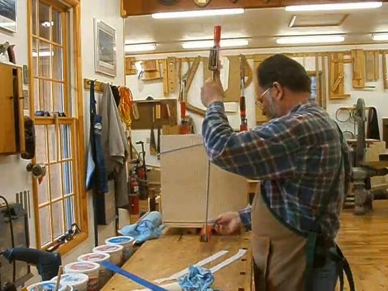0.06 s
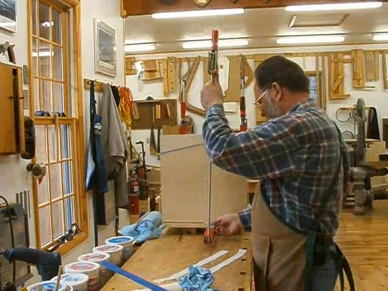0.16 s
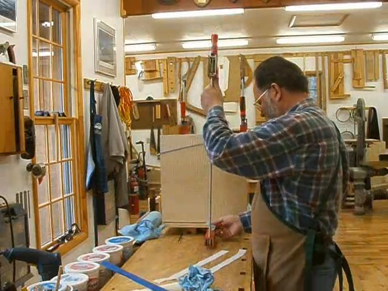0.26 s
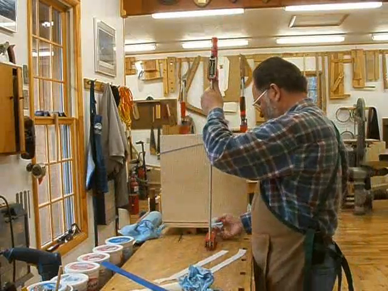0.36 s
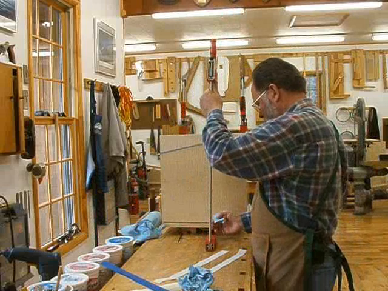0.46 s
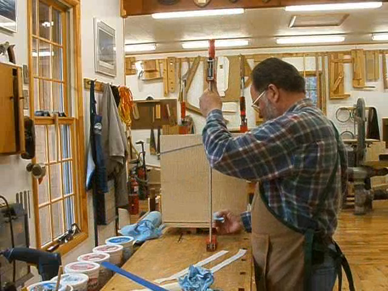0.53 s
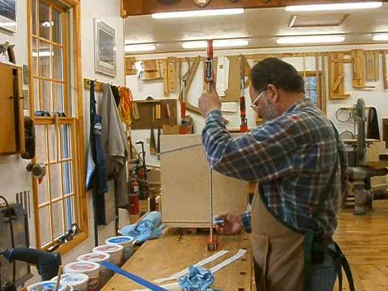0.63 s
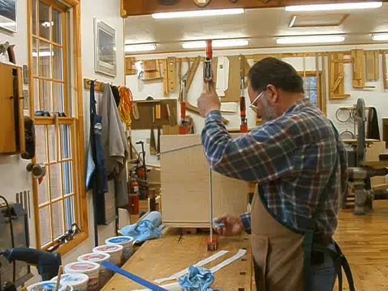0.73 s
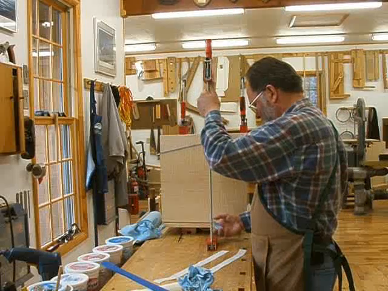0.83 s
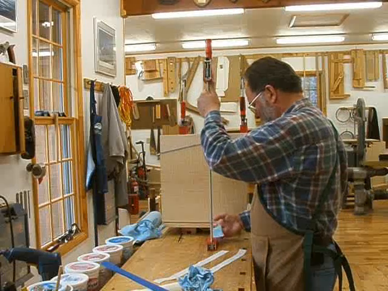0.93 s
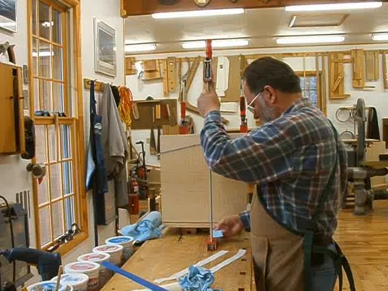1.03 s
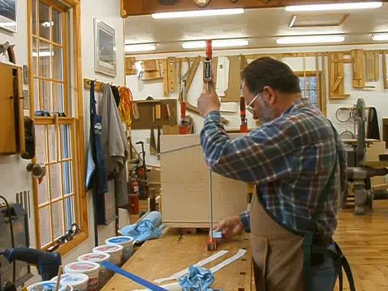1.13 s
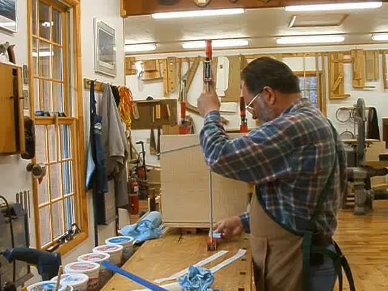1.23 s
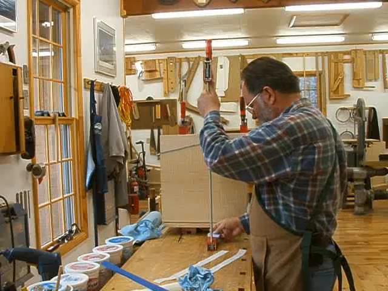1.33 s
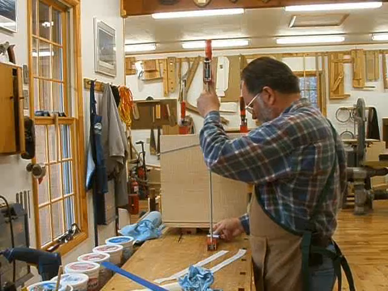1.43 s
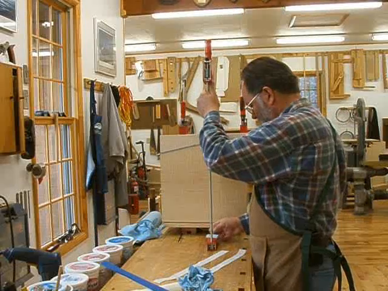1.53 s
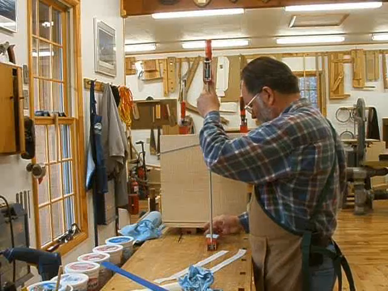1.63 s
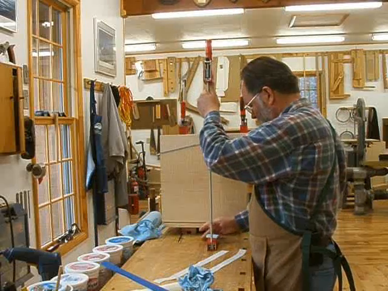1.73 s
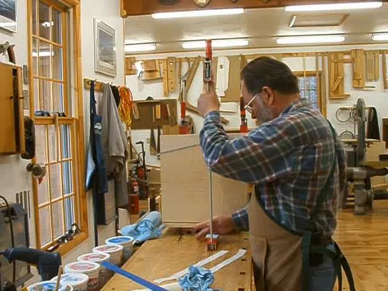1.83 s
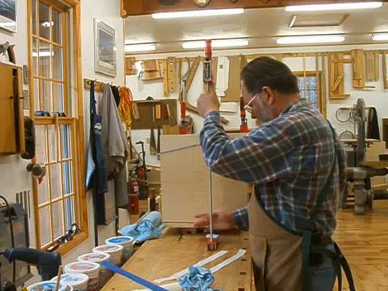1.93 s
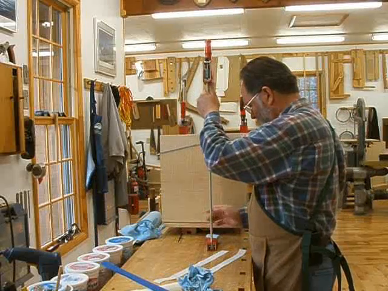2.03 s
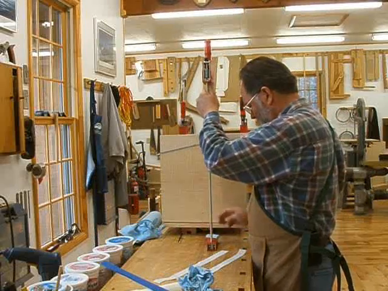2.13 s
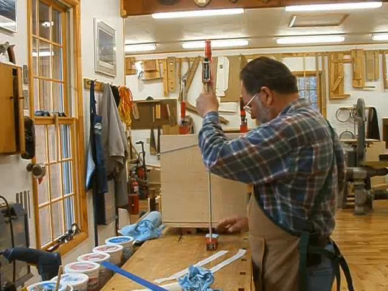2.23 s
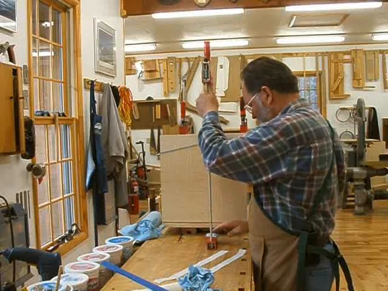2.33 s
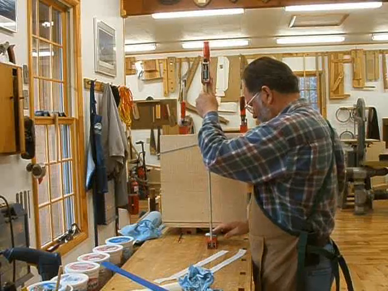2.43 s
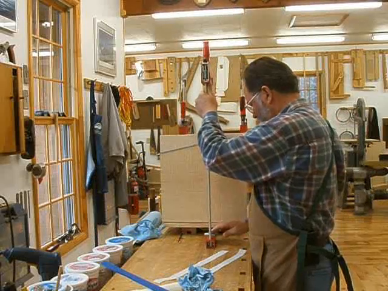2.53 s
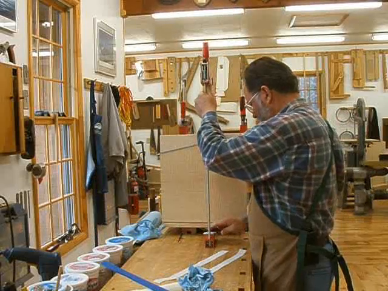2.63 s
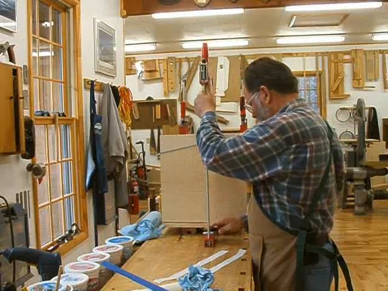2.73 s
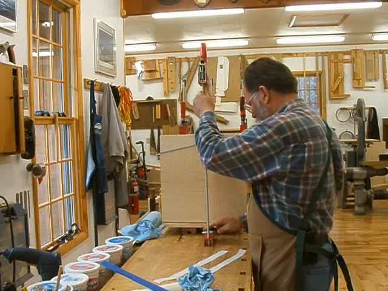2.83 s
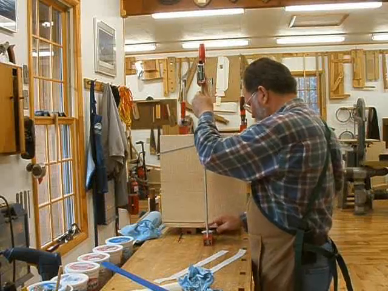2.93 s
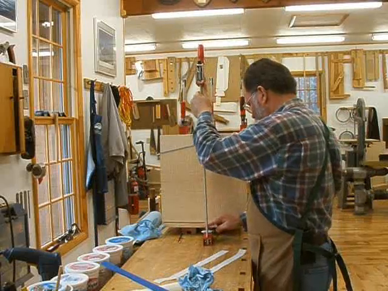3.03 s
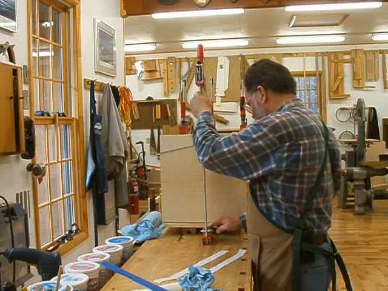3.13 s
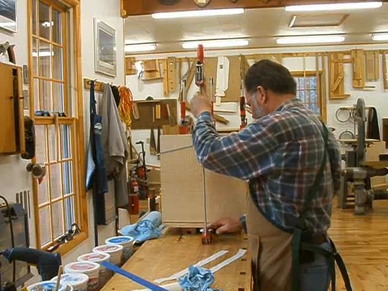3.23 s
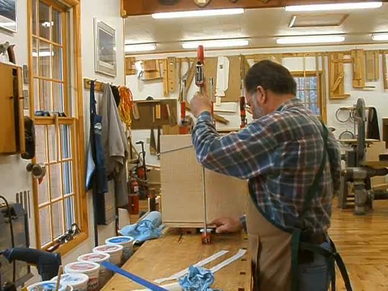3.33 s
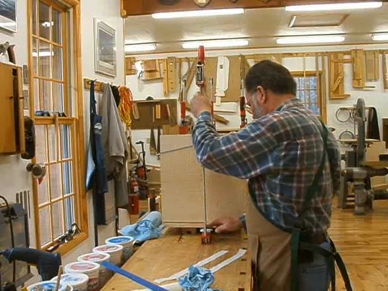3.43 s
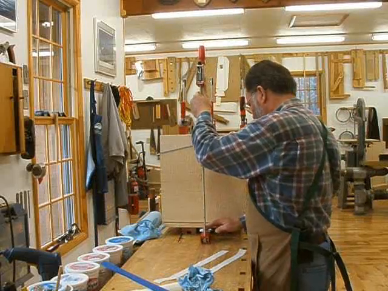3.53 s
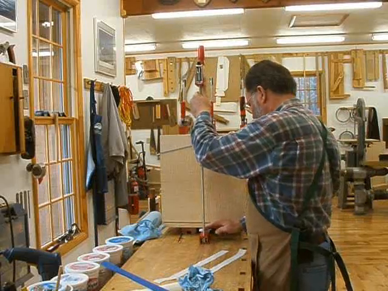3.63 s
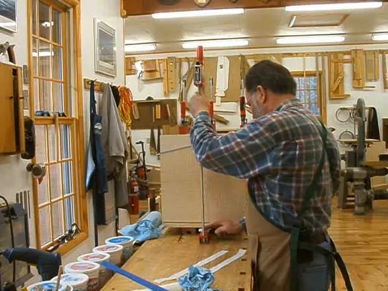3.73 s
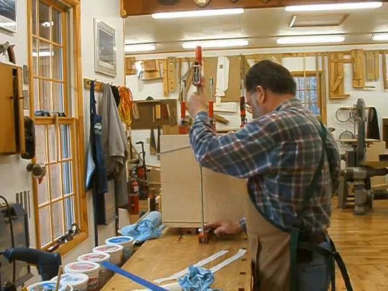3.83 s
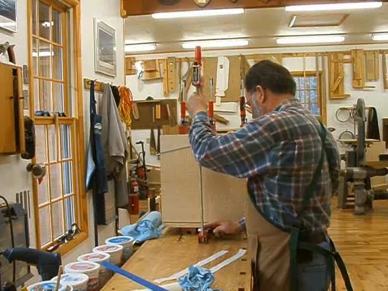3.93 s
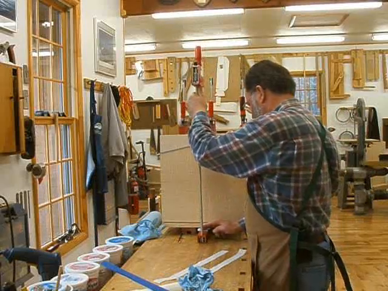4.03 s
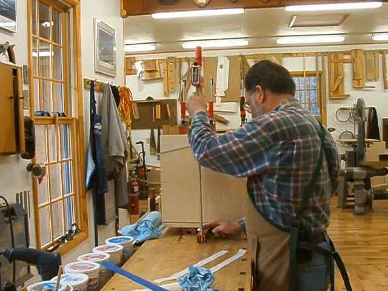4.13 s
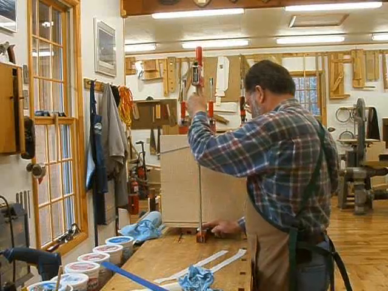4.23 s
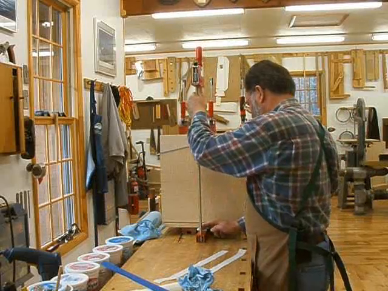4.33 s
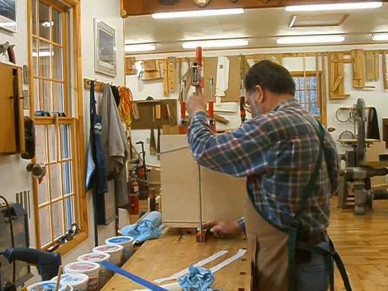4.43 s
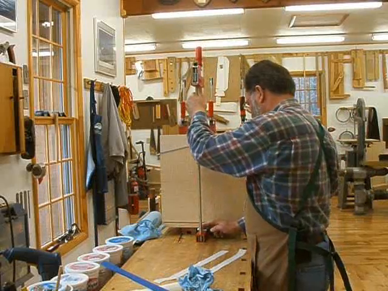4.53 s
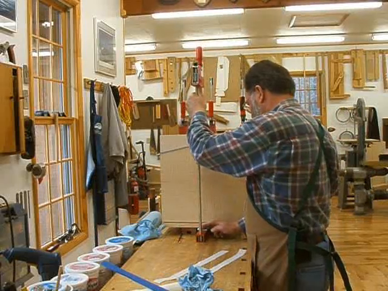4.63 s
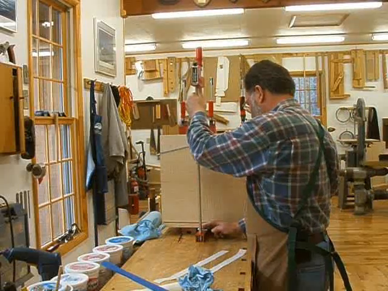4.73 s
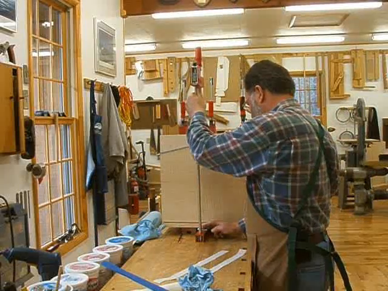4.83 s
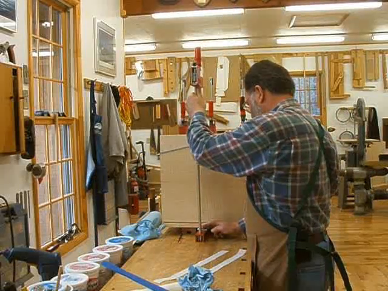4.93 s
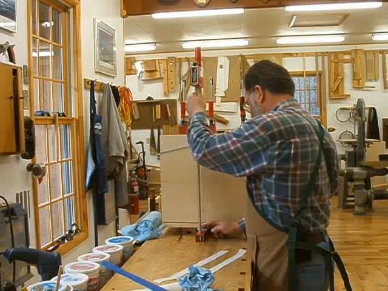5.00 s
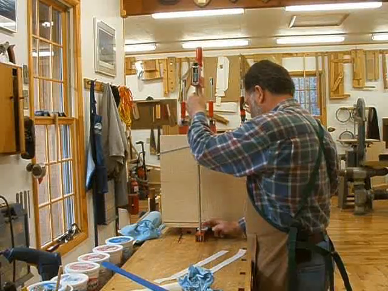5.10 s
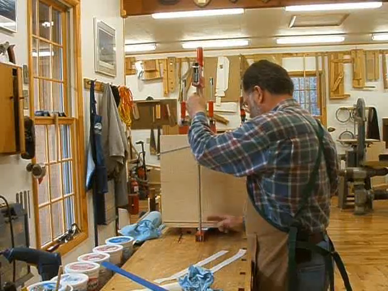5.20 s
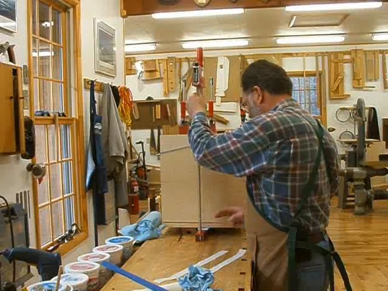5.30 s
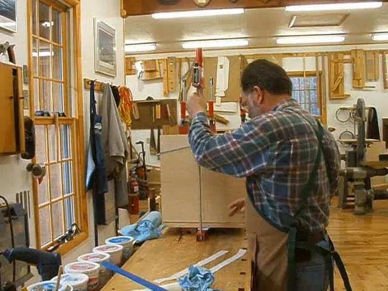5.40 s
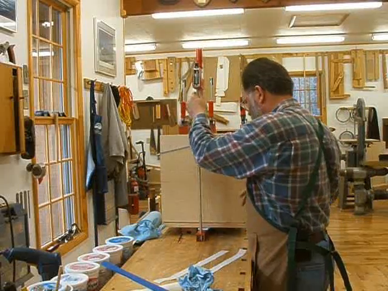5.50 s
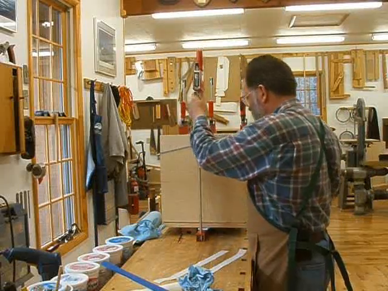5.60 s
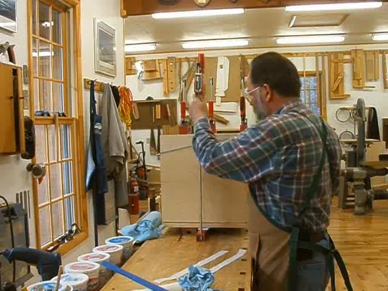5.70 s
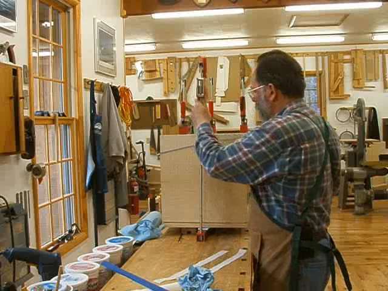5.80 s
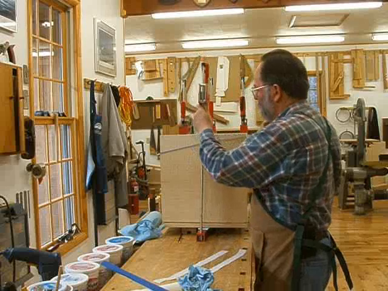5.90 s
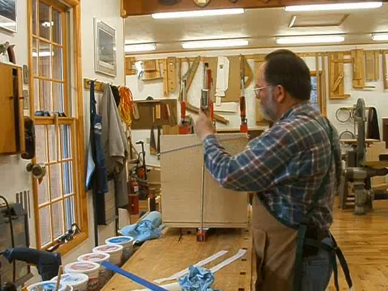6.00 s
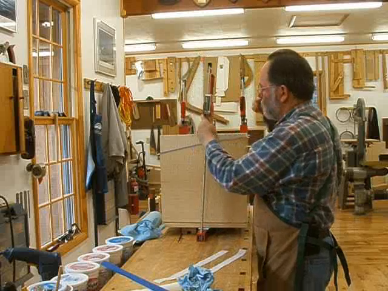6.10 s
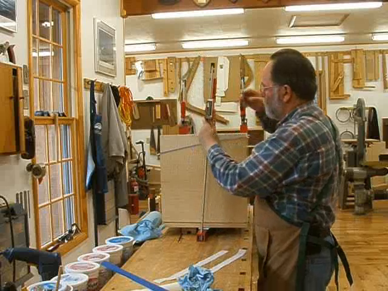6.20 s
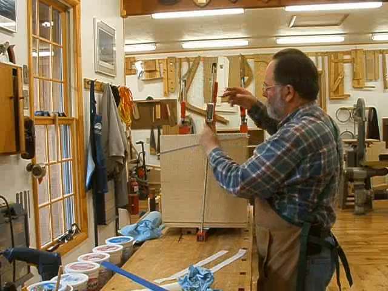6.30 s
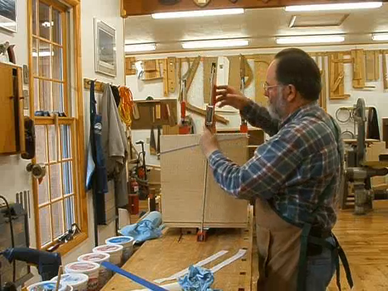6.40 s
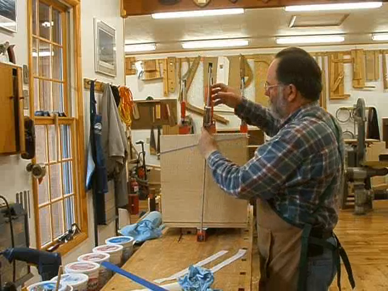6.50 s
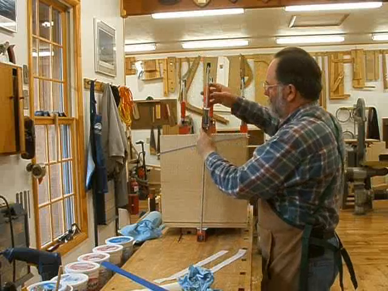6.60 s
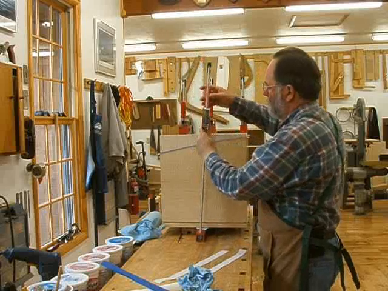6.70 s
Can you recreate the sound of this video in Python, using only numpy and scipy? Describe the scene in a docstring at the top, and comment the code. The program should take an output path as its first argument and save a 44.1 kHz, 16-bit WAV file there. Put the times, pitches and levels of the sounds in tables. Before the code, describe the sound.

A small workshop with steady ventilation, low hum and a faint fluttering very high whine. Early on, a bar clamp's jaw clacks hard in a tight cluster with a short steel ring and woody thud. Several seconds of soft finger rubbing and small taps follow. Near the end the clamp head groans, breaks loose, scrapes down the steel bar while slowing, and knocks the box. Fairly close microphone, both channels alike, short room echo.

```python
"""Steel bar clamp on a wooden box

A steel bar clamp is fitted to a wooden box in a workshop. The jaw clacks home as chattering noise bursts over
ringing modes, and fingers shift it quietly in soft noise. Then the head creeps, breaks loose, scrapes down the
bar ever more slowly as friction noise through steel resonances, and knocks against the box. Ventilation noise,
mains and fan tones fill the room, and a fluttering 8 kHz whine runs throughout, fine-grained with coarser
stretches."""
import sys
import numpy as np
from scipy import signal
from scipy.fft import rfft, irfft, next_fast_len
from scipy.io import wavfile
from scipy.ndimage import uniform_filter1d, map_coordinates

SR = 44100
rng = np.random.default_rng(int(sys.argv[2]) if len(sys.argv) > 2 else 0)


def file_out(sig):
    """Save sig as 16-bit WAV at sys.argv[1]."""
    # one column per channel
    cols = np.atleast_2d(sig).T
    # limit, then scale
    lim = np.clip(cols, -1, 1)
    pcm = np.round(lim * 32767).astype(np.int16)
    wavfile.write(sys.argv[1], SR, pcm)


N = 297675


def amp(db):
    """Decibels to gain."""
    return 10 ** (np.asarray(db) / 20)


def unit(x):
    """x at rms 1."""
    return x / np.sqrt(np.mean(x ** 2) + 1e-20)


def along(points, hz):
    """(Hz, value) points read on a log frequency axis."""
    f, v = np.transpose(points)
    return np.interp(np.log(hz + 1), np.log(f + 1), v)


def clock():
    """The time of each sample in seconds."""
    return np.arange(N) / SR


def wobble(rate):
    """A smooth random curve with rate knots a second."""
    knots = rng.standard_normal(int(N * rate / SR) + 4)
    return map_coordinates(knots, [clock() * rate])


def swell(middle_s, length_s):
    """A smooth rise and fall, 9 dB down at the ends of its length."""
    return np.exp(-(2 * (clock() - middle_s) / length_s) ** 2)


def filtered(x, response):
    """x times a complex response of frequency."""
    m = next_fast_len(N + SR // 2)
    return irfft(rfft(x, m) * response(np.fft.rfftfreq(m, 1 / SR)), m)[:N]


def coloured(x, spectrum, size=8192):
    """x through a causal minimum-phase filter of unit energy with the given spectrum."""
    gain = amp(along(spectrum, np.fft.rfftfreq(size, 1 / SR)))
    cepstrum = irfft(np.log(gain + 1e-6))
    # folding the cepstrum forward in time makes the filter causal
    cepstrum[1:size // 2] *= 2
    cepstrum[size // 2 + 1:] = 0
    pulse = irfft(np.exp(rfft(cepstrum)))
    return signal.fftconvolve(x, pulse / np.linalg.norm(pulse))[:N]


def noise(spectrum):
    """Coloured noise of rms 1."""
    return unit(coloured(rng.standard_normal(N), spectrum))


def burst(t, t60):
    """A dying rattle of unit energy: decaying noise with its spectrum flattened, then faded again."""
    spectrum = rfft(rng.standard_normal(len(t)) * amp(-60 * t / t60))
    flat = irfft(spectrum / (np.abs(spectrum) + 1e-9), len(t))
    rattle = flat * amp(-20 * t / t60)
    return rattle / np.linalg.norm(rattle)


def ringing(modes, t):
    """Fading sine modes, struck at slightly new strengths and random phases."""
    out = 0
    for hz, db, t60 in modes:
        level = amp(db + 1.7 * rng.normal() - 60 * t / t60)
        out = out + level * np.sin(2 * np.pi * (hz * t + rng.random()))
    return out


def resonator(modes):
    """The causal response of a bank of (Hz, width Hz, dB) resonances."""
    return lambda f: sum(amp(db) * 1j * f * w / (c * c - f * f + 1j * f * w) for c, w, db in modes)


def friction(slips_per_s=2500, smooth=0.7, catch_db=1):
    """Tiny random slips over a smooth rub, unsteady in strength, at rms 1."""
    slips = unit((rng.random(N) < slips_per_s / SR) * rng.standard_normal(N))
    rub = slips + smooth * rng.standard_normal(N)
    return unit(rub * amp(catch_db * wobble(110)))


# The moving air's spectrum. Each row: frequency in Hz, relative density in dB per Hz.
AIR_SPECTRUM = [(20, -11), (45, -10.5), (85, -10), (120, -3), (150, -3), (300, -1), (450, -3), (600, -6.5),
                (1000, -7.5), (1300, -10), (3000, -13.5), (6800, -16), (12000, -21.5), (15500, -26.5)]
# Mains and fan tones. Each row: frequency in Hz, level in dB rms before the waver.
HUM_TONES = [(120, -66), (240, -86), (360, -59), (480, -72.5), (704, -57.5), (1026, -75), (1408, -73.5)]


def ventilation(air_db=-48, waver_db=1, drift_rad=0.34):
    """Moving air is steady coloured noise; mains and fan tones waver slightly in level and phase."""
    t = clock()
    tones = 0
    for hz, db in HUM_TONES:
        level = amp(db + waver_db * wobble(3.87)) * np.sqrt(2)
        tones = tones + level * np.sin(2 * np.pi * hz * t + drift_rad * wobble(2.97))
    return amp(air_db) * noise(AIR_SPECTRUM) + tones


# Stretches in which the whine turns coarse. Each row: start in seconds, end in seconds.
COARSE_STRETCHES = [(.6, 1.6), (2.6, 4.6), (5.6, 6.7)]
# Spectra of the fine and coarse flutter. Each row: frequency in Hz, relative density in dB per Hz.
FINE_FLUTTER_SPECTRUM = [(10, -1.5), (90, -7.5), (140, 3), (250, -12), (330, -4), (520, -16), (700, -46)]
COARSE_FLUTTER_SPECTRUM = [(10, -3), (90, -13), (140, -2), (240, -4), (310, -8), (380, -6), (530, -6.5),
                           (610, -8), (750, -38)]


def whine(fine_db=-56.0, coarse_db=-54, pause_share=0.24):
    """An 8 kHz tone flutters; its coarse stretches drop back to the fine flutter ten times a second."""
    t = clock()
    tone = np.sqrt(2) * np.sin(2 * np.pi * 8000 * t)
    in_stretch = sum((t > start) & (t < end) for start, end in COARSE_STRETCHES)
    not_paused = (10 * t + pause_share / 2) % 1 > pause_share
    busy = (in_stretch * not_paused).astype(float)
    busy = uniform_filter1d(busy, size=200)  # softens the switching
    coarse = busy * amp(coarse_db) * noise(COARSE_FLUTTER_SPECTRUM)
    fine = (1 - busy) * amp(fine_db) * noise(FINE_FLUTTER_SPECTRUM)
    flicker = unit(amp(2.5 * wobble(130)))
    return tone * (coarse + fine) * flicker


# Decay of the shop's echoes. Each row: frequency in Hz, t60 in seconds.
SHOP_DECAY = [(80, 0.84), (300, 0.78), (1000, 0.83), (3200, 0.37), (7000, 0.25), (14000, 0.33)]


def workshop(x, delay_s=.004, size=3000):
    """The room's half-second answer: bass outlasts treble; each short block of sound gets a new random tail."""
    out = np.zeros(N + 2 * SR)
    for start in range(0, N, size):
        hz, t, z = signal.stft(rng.standard_normal(SR // 2), SR, nperseg=256)
        decay = amp(-60 * t / along(SHOP_DECAY, hz)[:, None])
        tail = signal.istft(z * decay, SR, nperseg=256)[1]
        echo = signal.fftconvolve(x[start:start + size], tail / np.linalg.norm(tail))
        out[start + round(delay_s * SR):][:len(echo)] += echo
    return out[:N]


# Soft rubbing noise of fingers and sleeve; the last row is a hand sliding just after the knock. Each row:
# middle in seconds, length in seconds, relative level in dB.
SOFT_RUBS = [(.29, 0.17, -56), (1.22, 1.3, -56), (2.65, 0.97, -52.5), (3.28, 0.33, -53), (4.1, 1.47, -56),
             (6.558, 0.18, -45)]
# The rubbing noise's spectrum. Each row: frequency in Hz, relative density in dB per Hz.
SKIN_SPECTRUM = [(200, -10), (460, 0), (800, -8), (1500, -9), (2200, 4.5), (3000, -2), (4400, 0.5),
                 (8000, -8), (12000, -8.5), (15500, -18)]


def fingers(resting_db=-63, uneven_db=2.0):
    """Skin and sleeve rub softly as uneven coloured noise, never quite still; a hand slides just after the
    knock."""
    rub_power = sum((amp(db) * swell(s, length)) ** 2 for s, length, db in SOFT_RUBS)
    strength = np.sqrt(amp(resting_db) ** 2 + rub_power)
    return strength * amp(uneven_db * wobble(25)) * noise(SKIN_SPECTRUM)


# Soft taps of hand, screw and pad on the box.
# Each row: start in seconds, centre in Hz, width in Hz, relative level in dB.
SOFT_TAPS = [(1.192, 2200, 1500, -42.5), (3.112, 1400, 500, -42), (3.113, 2750, 500, -45),
             (3.4913, 2200, 2200, -43), (3.507, 1800, 2000, -35.5), (3.598, 3380, 400, -39.5),
             (5.610, 156, 30, -40), (6.350, 230, 160, -33), (6.673, 120, 40, -35.5)]


def taps(tap_db=-3, t60_s=0.059):
    """Each soft tap is a short rustle in one resonance of the part that is touched."""
    t = np.arange(SR // 4) / SR
    out = np.zeros(N + SR)
    for s, hz, width_hz, db in SOFT_TAPS:
        push = rng.standard_normal(len(t)) * amp(db + tap_db - 60 * t / t60_s)
        body = signal.lfilter(*signal.iirpeak(hz, hz / width_hz, SR), push)
        out[round(s * SR):][:len(t)] += body * np.sqrt(SR / (np.pi * width_hz))  # equal power at any width
    return out[:N]


# Stick-slip groans of the box and a squeak of the head. Each row: middle in seconds, length in seconds,
# pitch at the middle in Hz, glide in octaves per second, level of the fundamental's peak in dB.
GROAN_TONES = [(5.717, .17, 105, 0.5, -46), (5.821, 0.066, 123.7, 4, -35), (5.938, 0.088, 462, 3.5, -43),
               (6.045, .1, 265, 0.2, -43), (6.11, .3, 120, -.6, -47)]


def groans(octave_db=-10.0, rough_db=0.2):
    """Regular catching and letting go makes short, slightly rough, gliding tones."""
    out = np.zeros(N)
    for s, length, hz, glide, db in GROAN_TONES:
        pitch = hz * 2 ** (glide * np.clip(clock() - s, -length, length))
        phase = 2 * np.pi * np.cumsum(pitch) / SR
        tone = np.sin(phase) + amp(octave_db) * np.sin(2 * phase)
        out += swell(s, length) * amp(db + rough_db * wobble(40)) * tone
    return out


# Jaw contacts. Each row: start in seconds, relative level in dB, relative treble in dB,
# nominal chatter decay in seconds.
JAW_CONTACTS = [(0.5911, -21, -2, 0.03), (0.5952, -14, -1.5, 0.031), (0.5993, -16, -4.5, 0.034),
                (0.6018, -28, -8, 0.014), (0.6091, -28.5, 1, 0.19), (0.6986, -34, -6, 0.16),
                (5.616, -44, -4, 0.065), (5.644, -50, -4, .07), (6.3268, -35, 3, 0.044),
                (6.3759, -29.5, -1, 0.1), (6.4235, -35, 3, 0.078), (6.513, -29.5, 5, 0.017),
                (6.5150, -24, 2, 0.026), (6.5199, -22, 0, 0.058), (6.531, -30, -1, 0.056),
                (6.6232, -33, 4.5, 0.046), (6.6695, -36, -1, 0.076), (6.686, -35.5, -5, 0.08)]
# Colours of the cast jaw and of the box's knock. Each row: frequency in Hz, relative density in dB per Hz.
JAW_SPECTRUM = [(150, -14), (600, -28), (1200, -5), (2000, 3.5), (3400, 4.5), (4700, -0.5), (6500, -2.5),
                (8700, -9), (11200, -3.5), (12600, -6.5), (14000, -14), (15500, -10)]
BOX_SPECTRUM = [(30, -29), (70, -6), (110, -2), (170, -14), (260, 2.5), (380, -0.5), (560, -1.5), (900, -4),
                (2000, -28), (6000, -112)]
# The casting's resonances. Each row: centre in Hz, width in Hz, gain in dB.
CASTING_RESONANCES = [(3420, 330, -3), (4450, 260, 0.5), (11500, 330, -11), (13100, 220, 6)]
# Rings of the jaw and of the bench under the box. Each row: frequency in Hz, relative level in dB, t60 in seconds.
JAW_RING = [(613, -6, 0.3), (1950, -16, .16), (2135, -5, .15), (3170, 5, 0.2), (3250, -22, 0.03),
            (4160, -19, 0.14), (4700, -3, 0.037)]
BENCH_RING = [(62.8, -2, 1.37), (76, -7, .7), (107.7, 4, 0.53), (262, -3, 0.49), (373, 4, 0.56)]
# A contact that chatters for CHATTER_S knocks the wood at the relative level WOOD_DB; longer ones pass on more.
CHATTER_S, WOOD_DB, WOOD_DB_PER_DOUBLING = .05, -14, 7


def clacks(steel_db=19, ring_db=-27, knock_db=20, knock_t60=0.18, bench_db=-43, treble_hz=6000):
    """Each contact chatters briefly in the cast jaw, rings it, and knocks the box and the bench below."""
    t = np.arange(SR) / SR
    steel, bright, ring, wood = np.zeros((4, N + SR))
    for s, db, treble_db, t60 in JAW_CONTACTS:
        start = round(s * SR)
        at = slice(start, start + len(t))
        chatter = amp(db + steel_db) * burst(t, t60)
        steel[at] += chatter
        bright[at] += chatter * amp(treble_db)
        wood_db = WOOD_DB + WOOD_DB_PER_DOUBLING * np.log2(t60 / CHATTER_S)
        wood[at] += amp(db + wood_db + knock_db) * burst(t, knock_t60)
        ring[at] += amp(db + ring_db) * ringing(JAW_RING, t)
        ring[at] += amp(db + bench_db) * ringing(BENCH_RING, t)

    def low(hz):
        """Share of the plain chatter; the rest takes each contact's own treble."""
        return 1 / (1 + (hz / treble_hz) ** 4)

    jaw = filtered(steel, low) + filtered(bright, lambda hz: 1 - low(hz))
    casting = filtered(jaw, resonator(CASTING_RESONANCES))
    return coloured(jaw + casting, JAW_SPECTRUM) + ring[:N] + coloured(wood, BOX_SPECTRUM)


# The head's one stroke down the bar: it creeps, breaks loose, reaches full speed and stops (seconds).
CREEP_S, LOOSE_S, FASTEST_S, STOP_S = 5.6, 5.846, 5.96, 6.5
CREEP_GROWS_DB_PER_S, SURGE_SHAPE = 32, 1.9


def stroke(creep_db, slowing_db_per_s, edge_s=.03):
    """Gain of a rubbing layer, 1 at full speed: a quiet creep, a surge, then a steady loss of speed."""
    t = clock()
    surge_left = np.clip((FASTEST_S - t) / (FASTEST_S - LOOSE_S), 0, 1) ** SURGE_SHAPE
    creep_loss_db = CREEP_GROWS_DB_PER_S * np.maximum(LOOSE_S - t, 0)
    slowing_loss_db = slowing_db_per_s * np.maximum(t - FASTEST_S, 0)
    gate = np.interp(t, [CREEP_S - edge_s, CREEP_S, STOP_S, STOP_S + edge_s], [0, 1, 1, 0])
    return amp(creep_db * surge_left - creep_loss_db - slowing_loss_db) * gate


def bowed(modes, evenness=.6):
    """Friction feeds the resonances and holds their ring at a fairly even strength; rms 1."""
    driven = unit(filtered(friction(), resonator(modes)))
    ring = signal.hilbert(driven, next_fast_len(N))[:N]
    return unit(ring.real / (np.abs(ring) + .1) ** np.clip(evenness, 0, 1))


# The head digs in and rubs harder. Each row: middle in seconds, length in seconds, extra level in dB.
HEAD_CATCHES = [(5.93, 0.015, 0), (5.982, 0.028, 4), (6.049, 0.014, 4), (6.114, 0.024, 8),
                (6.387, 0.02, 4.5), (6.433, 0.027, 5.5)]
# The bar sings out where the head bites. Each row: middle in seconds, length in seconds, relative level in dB.
BAR_BITES = [(6.024, .075, -33), (6.124, .085, -36), (6.34, 0.054, -40)]
# Colours of the scrape and the hiss. Each row: frequency in Hz, relative density in dB per Hz.
SCRAPE_SPECTRUM = [(50, -22), (110, 0), (300, -5.5), (550, -3), (750, 0), (1250, 1), (1650, -1.5),
                   (1950, 4.5), (2550, -3), (2900, 0.5), (4500, -7), (5000, -13), (7000, -20), (12000, -35)]
HISS_SPECTRUM = [(2650, -39), (4500, 1), (4890, -1), (6170, 6), (7990, 1), (8680, 2.5), (12400, -2.5),
                 (15500, -7)]
# The sliding head's resonances and the bar's bending modes.
# Each row: centre in Hz, width in Hz, relative gain in dB.
HEAD_RESONANCES = [(3310, 100, 6), (3546, 91, 10), (3730, 60, 0), (3840, 60, 1), (6400, 320, -22),
                   (7700, 50, -1)]
BAR_MODES = [(944, 12, -2.5), (1078, 7.7, 12), (1110, 13, -8), (1860, 24, -11), (4490, 30, -7)]


def slide(scrape_db=-36.0, hiss_db=-35, head_db=-35.5, bar_db=-43.5, bite_db=-3.0, scrape_share=0.65):
    """The head slips down the bar: it scrapes throughout, hisses and rasps most at speed, makes the steel sing."""
    force = friction()
    catch_db = sum(db * swell(s, length) for s, length, db in HEAD_CATCHES)

    scrape_gain = amp(scrape_db + scrape_share * catch_db) * stroke(creep_db=-8.5, slowing_db_per_s=10)
    scrape = scrape_gain * coloured(force, SCRAPE_SPECTRUM)

    hiss_gain = amp(hiss_db + catch_db) * stroke(creep_db=-15.5, slowing_db_per_s=30)
    hiss = hiss_gain * coloured(force, HISS_SPECTRUM)

    rasp_gain = amp(head_db + catch_db) * stroke(creep_db=-23, slowing_db_per_s=32)
    rasp = rasp_gain * unit(filtered(friction(), resonator(HEAD_RESONANCES)))

    bites = sum(amp(db + bite_db) * swell(s, length) for s, length, db in BAR_BITES)
    bowing = amp(bar_db) * stroke(creep_db=-11, slowing_db_per_s=25) + bites
    return scrape + hiss + rasp + bowing * bowed(BAR_MODES)


def scene(clack_room_db=-11, slide_room_db=-6):
    """Clamp, room and whine, alike in both channels."""
    background = ventilation() + whine()
    hits = clacks() + taps()
    scrape = slide()
    room = workshop(amp(clack_room_db) * hits + amp(slide_room_db) * scrape)
    mono = background + fingers() + groans() + room + hits + scrape
    return np.array([mono, mono])


def record(dry, ceiling=.45, offset=-.0029, top_hz=15520):
    """The microphone's electronics round off high peaks, cut all above a band limit and sit slightly off zero."""
    rounded = dry / (1 + (dry / ceiling) ** 4) ** (1 / 4)
    return np.array([filtered(channel, lambda hz: hz < top_hz) for channel in rounded]) + offset


dry = scene()
out = record(dry)
file_out(out)
```